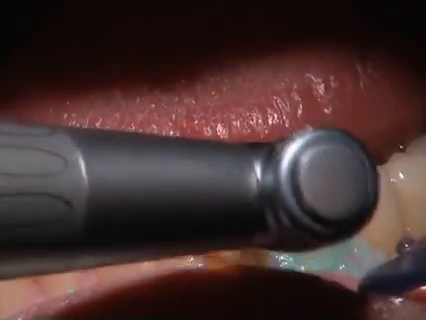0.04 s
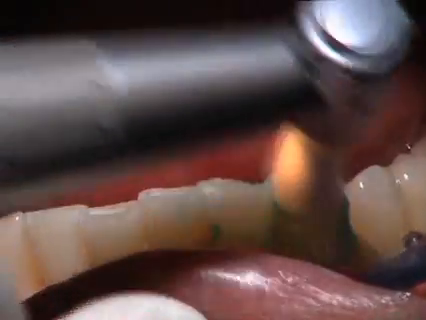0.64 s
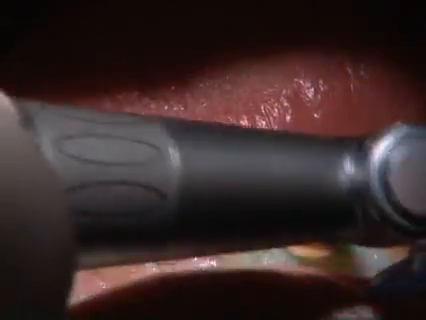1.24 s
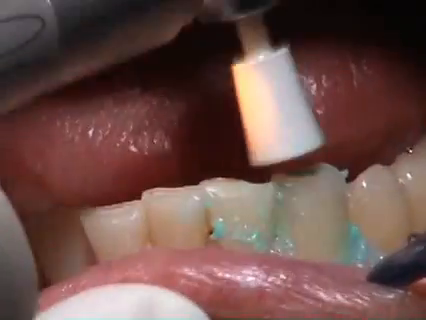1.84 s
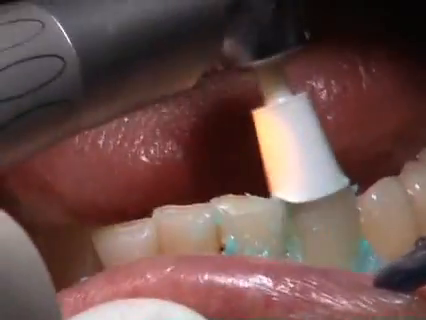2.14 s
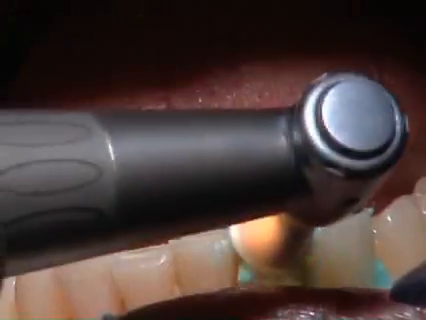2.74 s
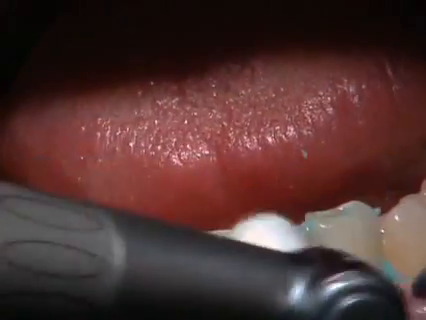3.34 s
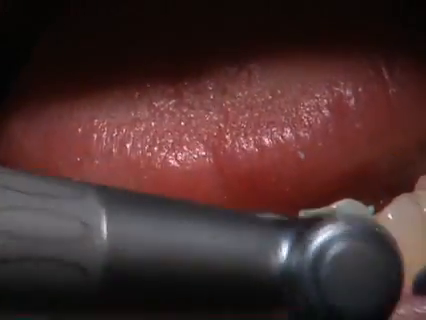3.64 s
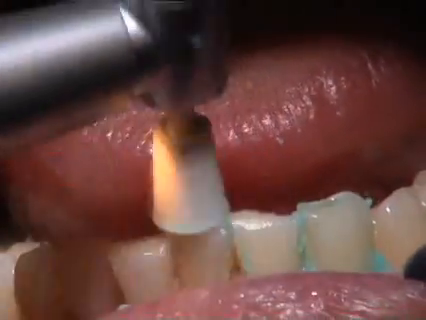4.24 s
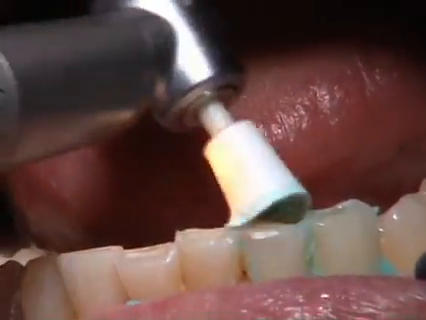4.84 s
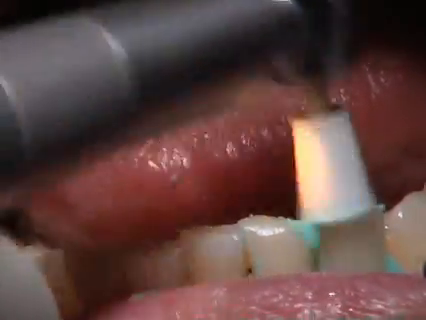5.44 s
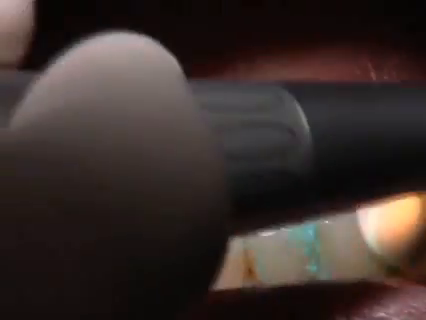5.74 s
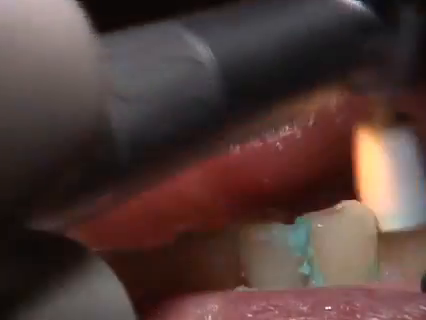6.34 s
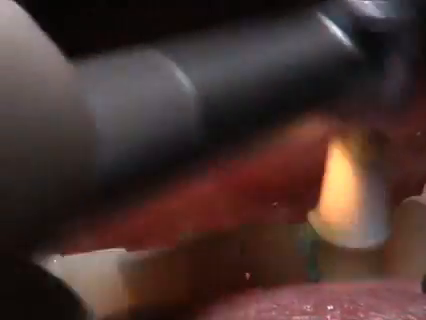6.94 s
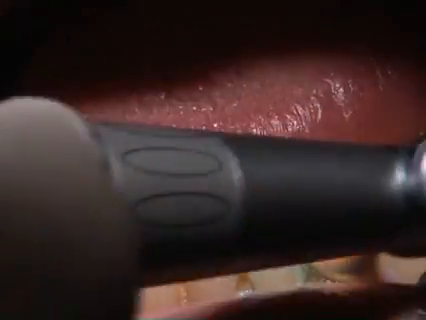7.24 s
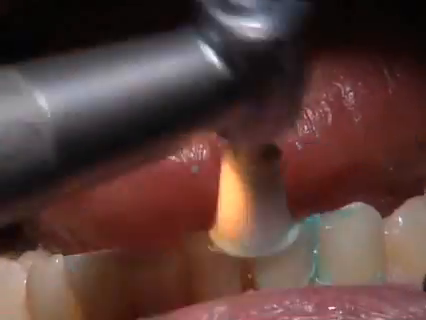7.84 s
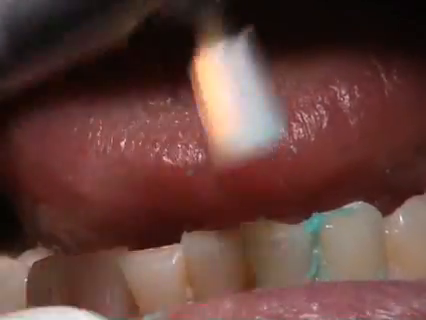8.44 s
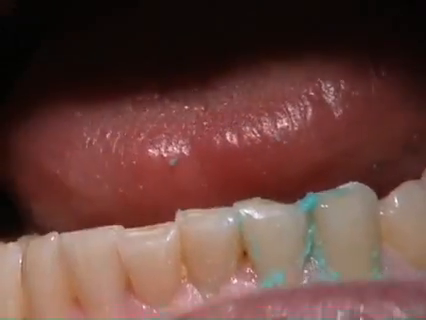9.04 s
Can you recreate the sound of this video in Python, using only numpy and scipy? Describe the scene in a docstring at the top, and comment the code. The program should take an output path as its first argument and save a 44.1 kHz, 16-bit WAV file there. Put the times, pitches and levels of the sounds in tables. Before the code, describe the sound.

An air-driven dental handpiece polishes teeth with a rubber cup, heard close to the mouth. Its high, steady hiss flutters and spits saliva over a faint motor whir and the light scrub of paste. Soft rubs and one brief, low rubber squeak come through. Near the end the tool fades and stops, leaving a few small slurps, a softer suction hiss and the low rumble of the clinic.

```python
"""A dental surgery, close to the chair: an air-driven handpiece polishes teeth with a rubber cup.
Its air hisses and spits saliva, changing colour as the head turns in the mouth; the motor whirs and
the cup scrubs paste on enamel, with soft rubs and one rubber squeak. The tool is drawn away and stops,
leaving a few slurps, a softer suction hiss and the rumble of the room."""
import sys
import numpy as np
from scipy import signal
from scipy.fft import rfft, irfft, next_fast_len
from scipy.io import wavfile
from scipy.ndimage import uniform_filter1d, map_coordinates

SR = 44100
rng = np.random.default_rng(int(sys.argv[2]) if len(sys.argv) > 2 else 0)


def unload_audio(sound):
    """Save the sound as a 16-bit wav file, at the path given as the first command line argument."""
    columns = np.transpose(np.atleast_2d(sound))
    # keep every value between -1 and 1, then stretch to whole-number steps
    steps = np.round(np.clip(columns, -1, 1) * 32767)
    wavfile.write(sys.argv[1], SR, steps.astype(np.int16))


N = 404838
TIME = np.arange(N) / SR

# EQ curves for the noise layers: frequency_hz, relative_db
HISS_EQ = [(3000, -46), (5900, -12.5), (6450, -6), (6800, 0), (7300, 2), (8100, 0), (8550, -0.5),
           (9200, -3.5), (10000, -0.5), (10800, -0.5), (13000, -49)]
SIZZLE_EQ = [(8500, -33.5), (9700, -3), (10300, -5), (10900, 2.5), (11300, 4), (11800, 4), (12450, 2),
             (12800, -16.5), (13100, -55)]
SCRUB_EQ = [(2000, -48), (3080, -20), (3220, -1.5), (4200, -2.5), (5100, -2.5), (5900, -0.5), (6500, -13),
            (9000, -36)]
WHIR_EQ = [(200, -35), (500, -8), (850, -10), (1100, -2.5), (1340, 2), (1450, -1), (1620, -1.5), (1950, -5),
           (2200, -3), (2550, -8), (3000, -8.5), (5000, -23)]
SUCTION_EQ = [(300, -24), (1000, -15.5), (2400, -19.5), (3500, -10), (4800, -7), (7200, -1), (9500, 0.5),
              (11000, 5.5), (12500, 0.5), (13100, -33)]
RUMBLE_EQ = [(10, 0.5), (27, -2), (36, 3), (47, -0.5), (58, -2.5), (70, -10), (80, -13.5), (97, -15.5),
             (120, -10), (142, -15.5), (170, -10), (205, -13.5), (230, -10), (270, -18.5), (345, -19),
             (410, -28), (900, -34)]
# ventilation hum: pitch_hz, level_db
HUM_TONES = [(119, -68.5), (169, -58.5)]
# fader rides for the wet sizzle, the paste scrub and the gear whine: time_s, relative_db
SIZZLE_RIDE = [(0, -30), (0.8, -36), (1.9, -34), (2.7, -31.5), (4.6, -32.5), (5.8, -34), (7.7, -32),
               (8.5, -33.5)]
SCRUB_RIDE = [(0, -46), (1.25, -47), (2.2, -45), (3.4, -48), (4.55, -50), (5.3, -47.5), (5.65, -46),
              (5.95, -41), (6.6, -41.5), (6.95, -46.5), (7.3, -39), (7.85, -51.5), (8.45, -48)]
WHINE_RIDE = [(0, -53.5), (2.4, -55.5), (3.0, -54.5), (4.15, -51), (4.45, -55), (6.1, -52), (6.6, -57),
              (7.2, -49), (8.3, -56.5)]
# the head swings its air leak toward the microphone: start_s, length_s, facing_share
HEAD_SWINGS = [(-0.3, 0.81, 0.27), (1.09, .35, 0.65), (2.72, 1.1, 0.72), (7.056, 0.44, 0.98)]
# the air catches saliva and spits: peak_s, length_s, relative_db
SPITS = [(0.043, 0.17, -32), (1.14, .06, -31), (2.35, 0.28, -32.5), (3.3, 0.23, -32), (3.59, 0.057, -29),
         (3.75, 0.1, -27.5), (4.2, 0.14, -32), (5.028, 0.081, -31), (6.379, 0.12, -28.5), (6.96, .04, -31),
         (7.411, 0.045, -30.5)]
# the cup presses on a tooth and closes a pocket: start_s, length_s, pressure_share, notch_hz
CUP_PRESSES = [(0.18, 0.49, .36, 9200), (1.58, .32, 0.38, 9100), (1.949, 0.63, 0.6, 9200),
               (2.73, .6, 0.29, 8250), (4.1, 0.27, 0.52, 7400), (4.36, .62, 0.7, 8800),
               (4.98, .5, 0.78, 9230), (5.68, .6, .33, 9700), (6.3, .56, .92, 9300), (7.0, .5, 0.2, 9700),
               (7.79, .46, .52, 8650), (8.25, 0.2, 0.9, 8900)]
# the jet glances off a finger or the cheek: start_s, fade_s, centre_hz, level_db
JET_GLANCES = [(0.2, .15, 7500, -32), (1.09, 0.4, 8970, -34), (3.699, .35, 9800, -29),
               (4.06, 0.1, 8230, -28.5), (4.4, 0.11, 10540, -27.5), (5.24, 0.45, 8070, -33),
               (5.77, 1, 8950, -28.5), (7.14, .4, 8620, -30), (8.48, 0.15, 10100, -34)]
# soft rubs and slurps in the mouth: peak_s, length_s, centre_hz, width_hz, level_db
MOUTH_RUBS = [(1.85, .25, 1250, 903, -52), (2.15, 0.99, 650, 600, -58), (6.599, .12, 400, 393, -65),
              (4.947, 0.31, 700, 597, -57.5), (5.647, .08, 1094, 1090, -49), (7.218, 0.46, 1380, 804, -51),
              (8.46, 0.088, 1230, 600, -49.5), (8.527, 0.087, 650, 910, -48),
              (8.814, 0.036, 420, 480, -46.5), (8.902, 0.13, 700, 800, -56), (9.08, 0.15, 740, 480, -49)]
# the path of the rubber squeak: time_s, pitch_hz, level_db
SQUEAK_GLIDE = [(5.58, 235, -70), (5.603, 245, -47), (5.625, 260, -48), (5.65, 232, -46), (5.672, 203, -45),
                (5.692, 209, -40), (5.72, 200, -77)]

LIFT_S, AIR_OFF_S = 8.53, 8.645  # the tool is drawn away; its air stops a moment later
HOLLOW_HZ, FLARE_DROP_HZ = 5560, 169.9  # the cup's hollow, and its drop as the rim flares when pressed


def amp(db):
    """Decibels to gain."""
    return 10 ** (np.asarray(db) / 20)


def unit(x):
    """x at rms 1."""
    return x / np.sqrt(np.mean(x ** 2) + 1e-20)


def curves(rows):
    """One automation curve for each column after the time."""
    times, *columns = np.transpose(rows)
    return [np.interp(TIME, times, column) for column in columns]


def wobble(rate_hz):
    """A smooth random curve with rate_hz knots a second."""
    return map_coordinates(rng.standard_normal(int(N * rate_hz / SR) + 4), [TIME * rate_hz])


def until(s, ramp_s):
    """A fade from 1 to 0, halfway down at s."""
    return .5 - .5 * np.tanh((TIME - s) / ramp_s)


def swell(s, length):
    """A bell-shaped envelope around s."""
    return np.exp(-2 * ((TIME - s) / length) ** 2)


def filtered(x, response):
    """x through a frequency response."""
    size = next_fast_len(N + SR // 2)
    return irfft(rfft(x, size) * response(np.fft.rfftfreq(size, 1 / SR)), size)[:N]


def rush(eq, patchy_db):
    """Turbulent noise of rms 1: patches of gain drift over time and frequency under an EQ curve."""
    spectra = signal.stft(rng.standard_normal(N), nperseg=1024)[2]
    patches = uniform_filter1d(rng.standard_normal(spectra.shape), size=6, axis=0)
    patches = uniform_filter1d(patches, size=14, axis=1)
    noise = signal.istft(spectra * amp(patchy_db * unit(patches)), nperseg=1024)[1][:N]
    hz, db = np.transpose(eq)
    return unit(filtered(noise, lambda f: amp(np.interp(np.log(f + 1), np.log(hz), db))))


def resonance(hz, width_hz):
    """Noise of rms 1 ringing in a band-pass, applied twice for steep skirts."""
    band = lambda f: 1j * f * width_hz / (hz * hz - f * f + 1j * f * width_hz)
    return unit(filtered(rng.standard_normal(N), lambda f: band(f) ** 2))


def gliding(hz, width_hz):
    """Noise of rms 1 in a resonance whose centre follows a curve."""
    drift = lambda: unit(filtered(rng.standard_normal(N), lambda f: 1 / (1 + (2 * f / width_hz) ** 2)))
    phase = 2 * np.pi * np.cumsum(hz) / SR
    return drift() * np.cos(phase) + drift() * np.sin(phase)


def tone(hz):
    """A sine of rms 1 that follows a pitch curve."""
    return np.sqrt(2) * np.sin(2 * np.pi * np.cumsum(hz) / SR)


def facing(rise_s=.09, drop_s=.028):
    """How squarely the air leak faces the microphone, 0-1: each swing builds, then ends abruptly."""
    out = np.zeros(N)
    for s, length, share in HEAD_SWINGS:
        build = np.interp(TIME, [s, s + length], [.54, 1])
        out += share * build * (1 - until(s, rise_s)) * until(s + length, drop_s)
    return out


def press_shape(s, length, ramp_s=.05, ease=.1):
    """One press: the rim lands, the hand leans in toward the middle, eases off and lifts."""
    held = until(s + length, ramp_s) - until(s, ramp_s)
    return held * (1 - ease * (1 - swell(s + length / 2, length / 2)))


def pressure():
    """How firmly the tilted cup sits on a tooth: 0 is light, about 1 is hard."""
    return sum(firm * press_shape(s, length) for s, length, firm, _ in CUP_PRESSES)


def room_bed():
    """Steady suction hiss over the rumble, slow throb and hum of the ventilation."""
    hum = sum(amp(db) * tone(hz + 6 * wobble(20)) for hz, db in HUM_TONES)
    throb = amp(-36.5) * resonance(18.7, width_hz=5.6)
    suction = amp(-36.5) * rush(SUCTION_EQ, patchy_db=.8)
    rumble = amp(-43) * rush(RUMBLE_EQ, patchy_db=1.2)
    return suction + rumble + throb + hum


def air_jet(hiss_db=-34.5, follows_scrub=.24, pressed_db=3, facing_db=2):
    """The jet at the head: hiss, spray and a deflected band flutter together, coloured by the mouth."""
    scrub_db, = curves(SCRUB_RIDE)
    level_db = hiss_db + follows_scrub * (scrub_db - scrub_db.mean())
    level_db += pressed_db * pressure() + facing_db * facing()
    hiss = amp(level_db + .95 * wobble(8)) * rush(HISS_EQ, patchy_db=2)
    spray = saliva_spray()
    flutter = amp(.48 * wobble(30))
    jet = until(AIR_OFF_S, ramp_s=.06) * (deflected_air() + hiss)
    return flutter * mouth_pocket(jet + spray)


def saliva_spray(shaded_db=-1.5, facing_db=-29, whistle_db=-4.5, bursts_per_s=1200):
    """Air catches saliva: a spitting sizzle that narrows to an airy whistle when strongest."""
    ride_db, = curves(SIZZLE_RIDE)
    ride = amp(ride_db + shaded_db * pressure())
    spit_power = sum((amp(db) * swell(s, length)) ** 2 for s, length, db in SPITS)
    wetness = np.sqrt(ride ** 2 + (amp(facing_db) * facing()) ** 2 + spit_power)
    sizzle = rush(SIZZLE_EQ, patchy_db=2.55)
    bursts = 1.0 * (rng.random(N) < bursts_per_s / SR)  # wet paste breaking up
    spatter = unit(np.sqrt(np.abs(uniform_filter1d(bursts, size=40))))
    sizzle *= 1.06 + .17 * spatter
    whistle = amp(whistle_db) * wetness / wetness.max() * resonance(11600, width_hz=760)
    fade = until(AIR_OFF_S + .097, ramp_s=.23)
    return fade * amp(.24 * wobble(8.2)) * wetness * (sizzle + whistle)


def deflected_air(steady_db=-37, facing_db=2, pressed_db=-3, sag_hz_per_s=750):
    """A bright band of the jet, shaded by the tilted cup, flaring when it strikes finger or cheek."""
    level_db = steady_db + facing_db * facing() + pressed_db * pressure()
    out = amp(level_db) * gliding(np.full(N, 8900), width_hz=1630)
    for s, fade_s, hz, db in JET_GLANCES:
        age = np.maximum(TIME - s, 0)
        flare = amp(db) * (1 - until(s, ramp_s=.019)) * np.exp(-age / fade_s)
        out += flare * gliding(hz - sag_hz_per_s * age, width_hz=1300)  # sinks as the head moves on
    return out


def polishing_cup(scrub_gain_db=3.5, muffled_db=-1.5, light_db=-48, pressed_db=-38):
    """Paste scrubs between cup and tooth; the cup's hollow rings louder and lower under pressure."""
    scrub_db, = curves(SCRUB_RIDE)
    press = pressure()
    hollow_hz = HOLLOW_HZ - FLARE_DROP_HZ * press ** 2 + 30 * wobble(8)
    scrub_db += scrub_gain_db + muffled_db * press + .28 * wobble(8)
    scrub = amp(scrub_db) * rush(SCRUB_EQ, patchy_db=2)
    ring = gliding(hollow_hz, width_hz=370) + amp(-8) * gliding(hollow_hz, width_hz=110)
    lower_ring = amp(-5) * press * gliding(.82 * hollow_hz, width_hz=860)
    ring_gain = (amp(light_db) + amp(pressed_db) * press) * amp(1.2 * wobble(25))
    return until(LIFT_S, ramp_s=.12) * (scrub + ring_gain * (ring + lower_ring))


def motor(whir_db=-49.5, follows_whine=.17, upper_db=-8, facing_db=5):
    """Vanes whir in the housing; two gear whines waver, the upper clearest facing the microphone."""
    whine_db, = curves(WHINE_RIDE)
    speed = 1 + .005 * wobble(7) + .0061 * wobble(120)
    lower = .43 * tone(2345 * speed) * amp(3.8 * wobble(45))
    lower += .93 * resonance(2304, width_hz=185)
    upper = amp(upper_db + facing_db * facing() + 2.9 * wobble(12)) * tone(4785 * speed)
    whir_gain = amp(whir_db + follows_whine * (whine_db - whine_db.mean()) + .5 * wobble(5))
    whir = whir_gain * rush(WHIR_EQ, patchy_db=1.9)
    return until(LIFT_S, ramp_s=.05) * (whir + amp(whine_db - 1) * (lower + upper))


def near_reflection(x, echo_s=.0069, echo=.23, centre_hz=4600):
    """A near surface returns the middle treble a few milliseconds late and ripples its spectrum."""
    bounce = lambda f: echo * np.exp(-(f / centre_hz - 1) ** 2)
    return filtered(x, lambda f: 1 + bounce(f) * np.exp(-2j * np.pi * f * echo_s))


def mouth_pocket(x, echo=.32, echo_s=.001108, width_hz=450, cut=.99, boost=.48, sealed_at=.68):
    """Each press closes a pocket that echoes the jet, swallows one band and lifts the band below."""
    band = lambda f, hz: np.exp(-((f - hz) / width_hz) ** 2)
    coloured = x.copy()
    for s, length, firm, hz in CUP_PRESSES:
        colour = filtered(x, lambda f: boost * band(f, .95 * hz) - cut * band(f, hz))
        coloured += min(firm, sealed_at) * press_shape(s, length) * colour
    delayed = filtered(coloured, lambda f: np.exp(-2j * np.pi * f * echo_s))
    return coloured + echo * pressure() * delayed


def mouth_rubs():
    """Each rub or slurp is a short swell of noise in one hollow resonance."""
    return sum(amp(db) * swell(s, length) * resonance(hz, width)
               for s, length, hz, width, db in MOUTH_RUBS)


def rubber_squeak():
    """Rubber sticks and slips for a moment: a low gliding note with a weak third harmonic."""
    hz, db = curves(SQUEAK_GLIDE)
    gate = (TIME > SQUEAK_GLIDE[0][0]) & (TIME < SQUEAK_GLIDE[-1][0])
    return gate * amp(db) * (tone(hz) + amp(-24) * tone(3 * hz))


def scene():
    """The handpiece up close over the room bed, the same in both channels."""
    handpiece = near_reflection(air_jet() + polishing_cup() + motor())
    mono = handpiece + rubber_squeak() + mouth_rubs() + room_bed()
    return np.array([mono, mono])


def record(dry):
    """A brick-wall low-pass takes off the very top of the hiss."""
    return np.array([filtered(channel, lambda hz: hz < 13030) for channel in dry])


dry = scene()
out = record(dry)
unload_audio(out)
```